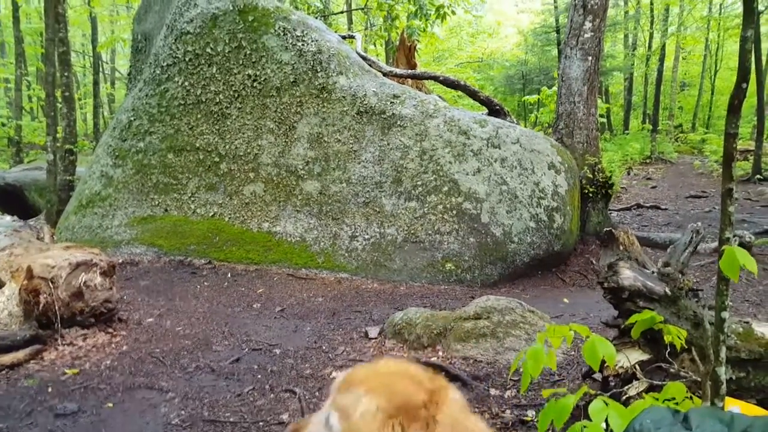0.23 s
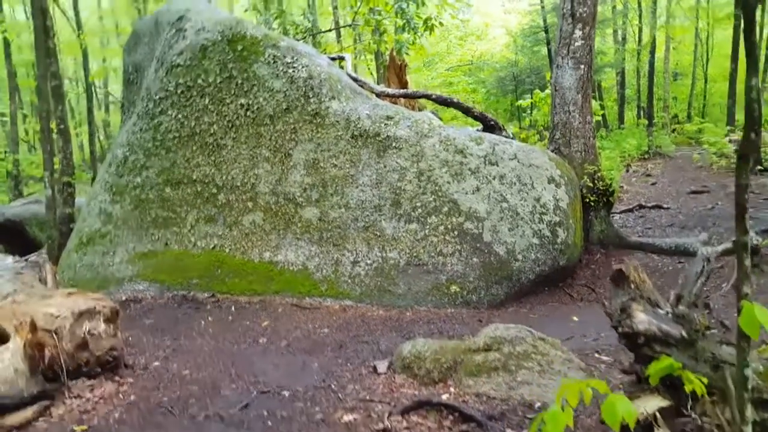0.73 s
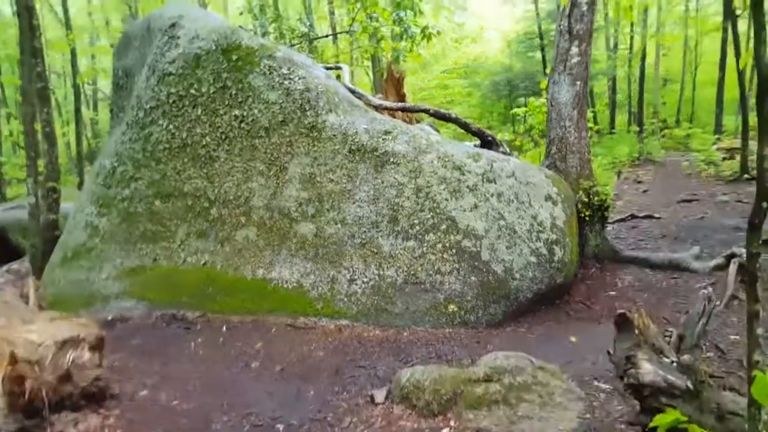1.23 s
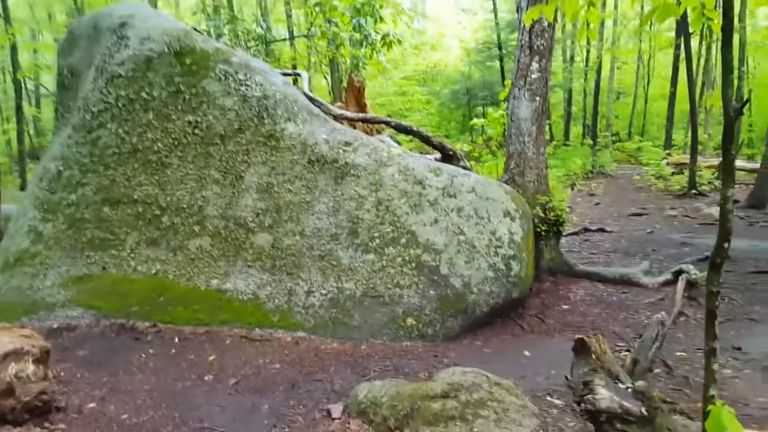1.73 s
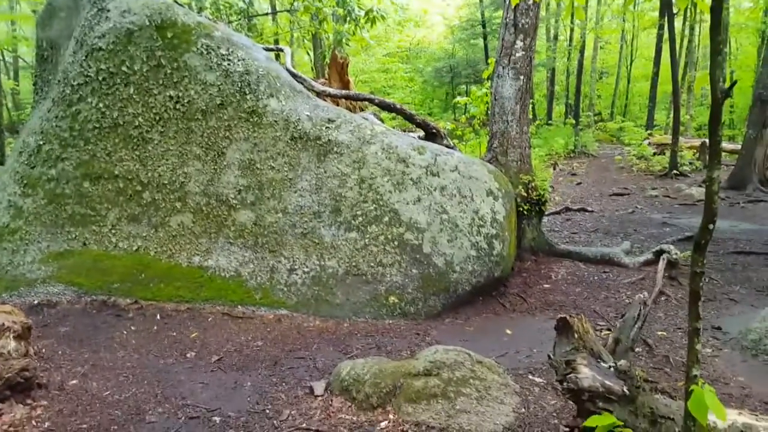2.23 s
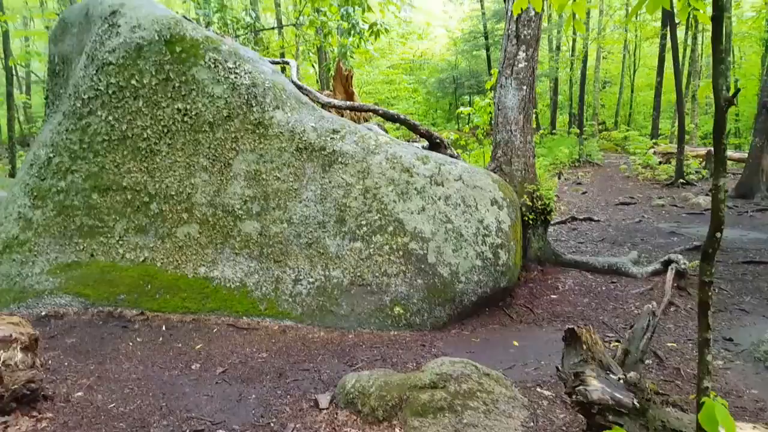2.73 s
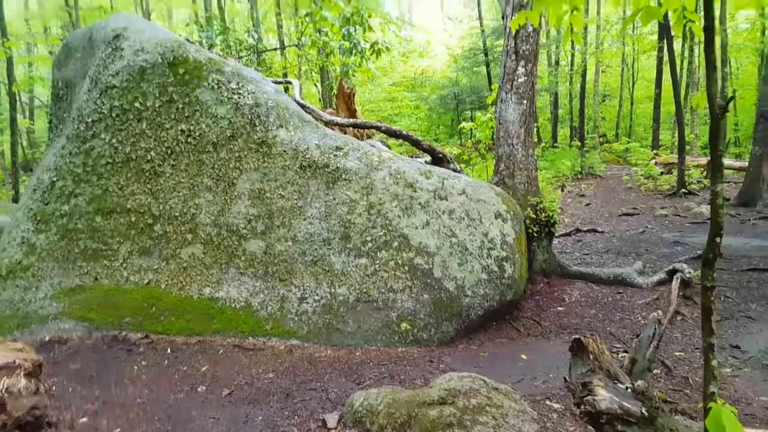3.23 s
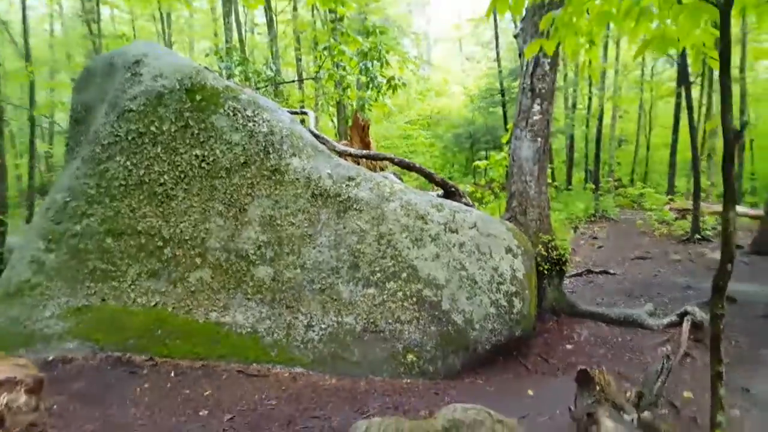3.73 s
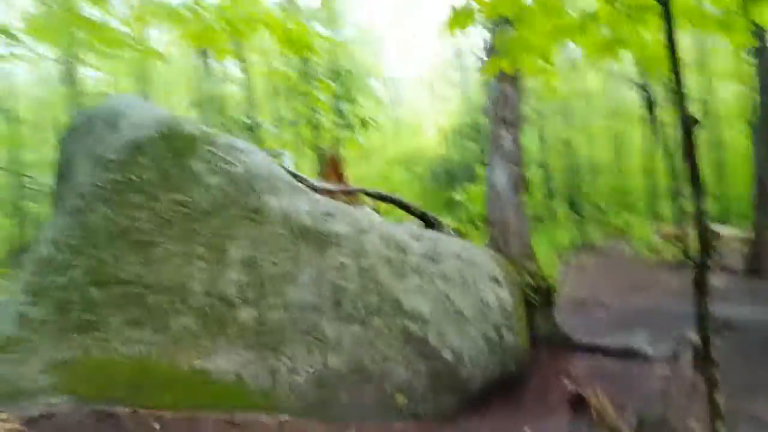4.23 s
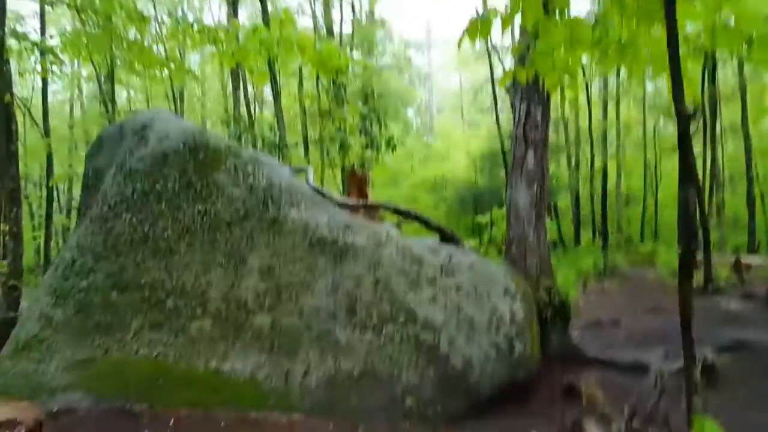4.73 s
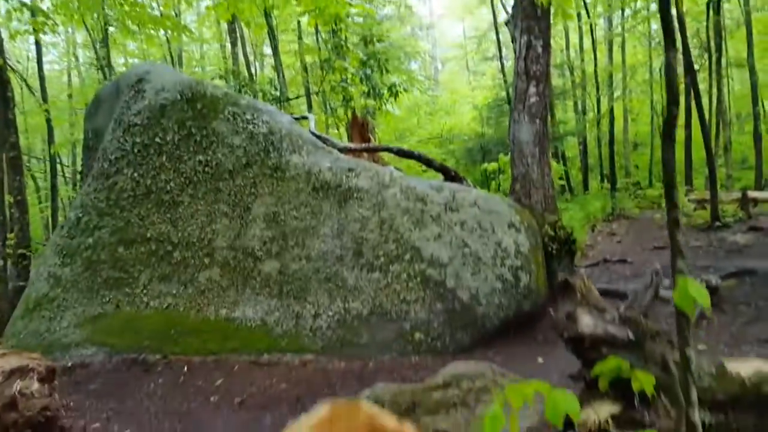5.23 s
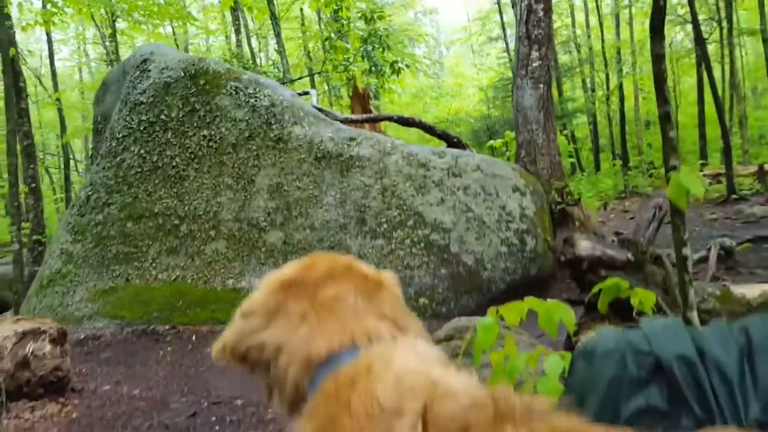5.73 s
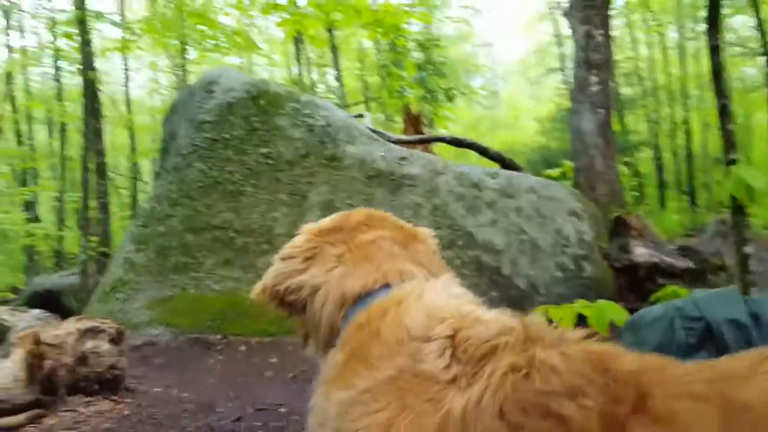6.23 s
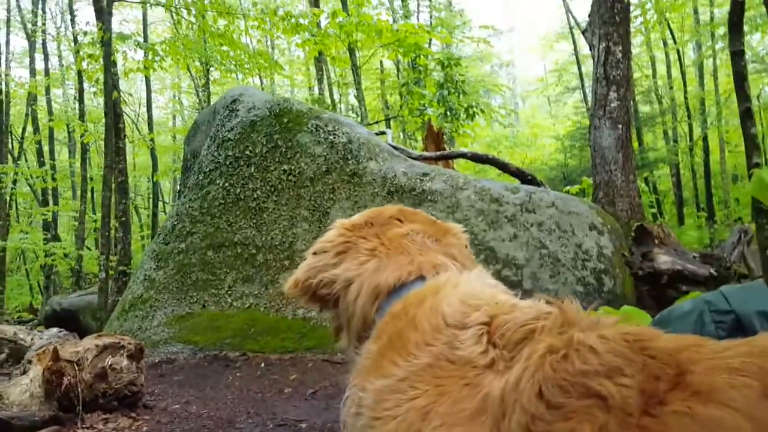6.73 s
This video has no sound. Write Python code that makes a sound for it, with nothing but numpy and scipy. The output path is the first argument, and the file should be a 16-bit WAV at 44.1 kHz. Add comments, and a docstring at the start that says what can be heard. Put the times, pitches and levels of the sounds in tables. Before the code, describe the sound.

Far water and leaves rush faintly throughout in a wet forest. Scattered drops pat down, twigs tick, and a nylon sleeve swishes softly near the microphone during the first second and a half. From about 1.1 to 2.9 seconds a nearby dog growls, a low, fluttering rumble that catches unevenly and sags at the end. Drips and ticks fill the pause. At 4.6 seconds a finger scrapes the right side of the microphone with a sharp click and dull thuds, briefly blocking that side and rubbing off by 4.9 seconds. A second, slightly louder growl swells from 4.8 seconds, with the mouth shut and more soft sleeve swishes. Around 6.2 seconds it breaks into a short, higher, falling hum, which leads straight into a third low growl lasting until about 7 seconds.

```python
"""A wet forest, a hand-held camera close to a dog. It growls three times, low and with its mouth nearly
shut: vocal pulses ring in throat and muzzle, weakening and slowing with each flap of the rumble, and a
short hum joins the last two growls. Far water and leaves rush, drops pat down from the trees, twigs tick
and a nylon jacket sleeve swishes as the camera moves. After the first growl a finger slides over the
right microphone port, seals it and lifts off."""
import sys
import numpy as np
from scipy import signal
from scipy.fft import rfft, irfft, next_fast_len
from scipy.io import wavfile
from scipy.ndimage import uniform_filter1d, map_coordinates

SR = 44100
rng = np.random.default_rng(int(sys.argv[2]) if len(sys.argv) > 2 else 0)


def pcm_store(signal):
    """Save signal as 16-bit PCM."""
    levels = np.round(np.clip(np.atleast_2d(signal), -1, 1) * 32767)
    wavfile.write(sys.argv[1], SR, levels.astype(np.int16).T)


N = 307816
T = np.arange(N) / SR

# far water and leaves: (frequency [Hz], relative density [dB])
FOREST_SPECTRUM = [(15, -42), (25, -7), (96, -4), (160, -5.5), (215, -3.5), (340, -4), (433, -5), (509, -5),
                   (804, -4.5), (1080, -6), (1410, -7), (2120, -5.5), (10100, -23), (13200, -31),
                   (15500, -28)]
# how alike the two ports hear them: (frequency [Hz], correlation [-1 to 1])
FOREST_LIKENESS = [(60, 0.25), (180, 0.92), (550, 0.46), (1650, -0.41), (4970, 0.2), (15000, -0.73)]
# twigs and leaves ticking: (time [s], level [dB], ring [Hz], relative fizz [dB])
TWIG_TICKS = [(0.057, -42, 13900, -3), (0.8733, -36.5, 2760, -16), (0.9777, -27, 3040, -18),
              (1.343, -33.5, 1490, -11), (1.3886, -31.5, 810, -17), (1.4636, -37, 1340, -16),
              (1.878, -31, 1410, -23), (1.93, -32.5, 2830, -30), (2.4345, -33, 1080, 3.5),
              (3.04, -51, 12400, -6), (3.235, -43, 3560, 10), (3.6796, -45.5, 11700, 0),
              (3.86, -48, 13000, -6), (5.382, -34.5, 1240, -21), (6.022, -30.5, 2120, -15),
              (6.8298, -32, 970, -21)]
# a twig's modes: (frequency [multiple of the ring], gain [share])
WOOD_MODES = [(1, 0.82), (.69, 0.75)]
# near drops on soil and cloth: (time [s], level [dB], ring [Hz], relative spatter [dB])
NEAR_DROPS = [(0.053, -35.5, 660, -18), (0.095, -37, 403, -15), (0.307, -27.5, 650, -11),
              (0.729, -34.5, 533, -15), (0.891, -34, 420, -7), (0.961, -23.5, 1250, -26),
              (2.938, -34, 600, -1), (3.167, -32, 546, -8), (3.098, -38.5, 403, -14),
              (3.809, -33.5, 1060, -24), (3.924, -35, 480, -7), (3.945, -37, 450, -14),
              (3.98, -36.5, 420, -5), (4.058, -39, 700, -9), (4.104, -30.5, 546, -12),
              (4.529, -38, 470, -15)]

# the sleeve's body, then its hiss when sliding fast: (frequency [Hz], relative density [dB])
CLOTH_SPECTRUM = [(100, -1), (300, 2.5), (700, 4), (1500, 1), (2000, 0), (2800, 4.5), (3500, -1),
                  (5500, -8), (7500, -6), (10000, -12), (13000, -8.5), (16000, -20)]
HISS_SPECTRUM = [(1500, -35), (3500, -3), (5000, -1.5), (7300, -2.5), (10000, -8.5), (13000, -11),
                 (16000, -10.5)]
# moves of the arm: (peak time [s], relative level [dB], rise [s], fall [s])
SLEEVE_SWISHES = [(0.42, -48, 0.17, 0.61), (0.63, -50.5, 0.3, 0.8), (.96, -52, 0.27, 0.19),
                  (1.28, -54, 1, 0.95), (4.46, -52.5, 0.23, 0.067), (5.27, -50, 0.32, 0.47),
                  (5.78, -51, 0.4, 0.25)]
# the weave scrapes: (peak time [s], relative level [dB], rise [s], fall [s], centre [Hz],
# glide [octaves/s])
WEAVE_SCRAPES = [(.55, -53, 0.46, 0.47, 2420, 0), (1.25, -54.5, 0.42, 0.4, 3550, 0)]

# the microphone port's own colour: (frequency [Hz], gain [dB])
PORT_COLOUR = [(5500, 10.5), (8000, 1.5), (9800, -9), (13000, -5.5), (16000, -6)]
# what still enters the right port under the finger: (time [s], gain [dB])
PORT_SEAL = [(4.6, 0), (4.7, -28), (4.76, -28), (4.89, 0)]
# the fingertip scrapes the port, whose cavity rings: (peak time [s], relative level [dB], rise [s],
# fall [s], resonance [Hz], glide [octaves/s], width [octaves])
FINGER_SCRAPES = [(4.603, -21, 0.042, 0.038, 3830, -35, 0.95), (4.621, -17, 0.034, 0.038, 2840, 38, 0.43),
                  (4.815, -34, 0.027, 0.056, 1330, 2, 0.46), (4.86, -30.5, 0.028, 0.029, 1950, 12, 0.41),
                  (4.92, -45, 0.026, 0.051, 3120, -23, 1), (4.945, -51.5, 0.072, 0.069, 8400, -3, 0.092)]
# it presses on the port: (peak time [s], level [dB], rise [s], fall [s], corner [Hz], glide [octaves/s])
FINGER_THUDS = [(4.609, -28.5, 0.057, 0.024, 1300, -38), (4.657, -21, 0.024, 0.07, 820, -32),
                (4.761, -23.5, 0.0094, 0.071, 388, -1), (4.843, -24.5, 0.067, 0.057, 830, -1)]

# the voice breaks into a higher register: (time [s], pitch [Hz], level [dB])
HUM_COURSE = [(6.16, 174.7, -27), (6.185, 154, -29), (6.215, 156.3, -27), (6.25, 151, -28.5),
              (6.275, 145, -29.5), (6.29, 144, -30)]
# the hum's harmonics: (frequency [multiple of the pitch], relative level [dB])
HUM_HARMONICS = [(1, 11), (2, -8), (3, -8), (4, -34)]
# throat and muzzle, lips slightly parted, then shut: (frequency [Hz], gain [dB])
MUZZLE_PARTED = [(45, -24), (70, 1.5), (100, 0.5), (175, 4), (205, 2.5), (235, -3.5), (280, 0.5),
                 (330, 7.5), (410, 1.5), (470, -8.5), (525, -23.5), (580, -10.5), (635, -3.5), (690, -13),
                 (760, -20), (880, -36), (1000, -29.5), (1085, -18), (1230, -40), (1340, -29), (1600, -56),
                 (3000, -68)]
MUZZLE_SHUT = [(40, -12), (65, -4), (90, -0.5), (140, 4.5), (190, 1.5), (215, -7), (245, -22), (290, -8.5),
               (330, -8.5), (500, -11), (600, -12.5), (660, -18), (730, -27), (850, -29), (1000, -30.5),
               (1300, -29), (3000, -69)]
# what each band loses when the voice dulls: (frequency [Hz], loss [share])
DULLING_SHARES = [(100, 0), (190, 0.11), (330, 0.36), (420, 0.49), (640, 0.83)]
# the growls: (start [s], end [s], full pitch [Hz], pitch rise [s], sag [Hz], lateness of the sag [power],
# relative level [dB], swell [s], mouth opening [s], dulling before it opens [dB, times the band's share],
# roughness [factor], flapping settles [s])
DOG_GROWLS = [(1.064, 2.85, 105, .2, 25.8, 5.95, -35, 0.08, 0.69, 26.5, 0.97, 1.6),
              (4.8, 6.175, 100.3, 0.28, 1.8, 3.44, -31, 0.3, 0.55, 2, 1.1, 1.14),
              (6.29, 7.02, 93, 0.0046, 9.5, 0.83, -33.5, 0.0054, .011, 2, 0.38, 0.79)]
# the voice catches and surges back: (time [s], depth [0-1])
VOICE_CATCHES = [(1.358, .9), (1.445, .7), (1.488, .7), (1.62, 1), (1.732, .5), (1.86, .2), (1.948, .7),
                 (2.122, .3), (2.255, .4), (4.915, .6), (4.98, 1), (5.065, .8), (5.148, .5), (5.318, .8),
                 (5.403, .8), (5.447, .7), (5.49, .8), (5.532, .8), (5.665, .9), (5.792, .6), (5.932, .9),
                 (6.025, .6), (6.06, .4), (6.11, .4), (6.355, .2)]


def amp(db):
    """Decibels to gain."""
    return 10 ** (np.asarray(db) / 20)


def unit(x):
    """Scaled to rms 1."""
    return x / np.sqrt(np.mean(x ** 2) + 1e-20)


def along(points, hz):
    """(Hz, value) points read on a log axis."""
    f, v = np.transpose(points)
    return np.interp(np.log(hz + 1), np.log(f + 1), v)


def curves(rows):
    """Each column after the time, read at every sample."""
    times, *columns = np.transpose(rows)
    return [np.interp(T, times, column) for column in columns]


def wobble(rate):
    """A smooth random curve, rate knots a second."""
    return map_coordinates(rng.standard_normal(int(N * rate / SR) + 4), [T * rate])


def swell(peak_s, rise_s, fall_s):
    """Gain of one stroke: a rounded hump, 20 dB down at rise_s before its peak and fall_s after it."""
    distance = (T - peak_s) / np.where(T < peak_s, rise_s, fall_s)
    return amp(-20 * np.minimum(distance ** 2, 10))


def filtered(x, response):
    """x times a response of frequency."""
    size = next_fast_len(N + SR // 2)
    return irfft(rfft(x, size) * response(np.fft.rfftfreq(size, 1 / SR)), size)[..., :N]


def causal(spectrum, size=8192):
    """Log gain and phase of the causal filter that has this spectrum."""
    cepstrum = irfft(np.log(amp(along(spectrum, np.fft.rfftfreq(size, 1 / SR)))))
    cepstrum[1:size // 2] *= 2
    cepstrum[size // 2 + 1:] = 0
    return rfft(cepstrum)


def rush(spectrum, likeness, patchy_db):
    """Stereo noise of rms 1 with patches of random gain; likeness lists (Hz, left-right correlation)."""
    bins = signal.stft(rng.standard_normal((2, N)), nperseg=512)[2]
    patches = uniform_filter1d(rng.standard_normal(bins.shape[1:]), size=6, axis=0)
    patches = uniform_filter1d(patches, size=12, axis=1)
    pair = signal.istft(bins * amp(patchy_db * unit(patches)), nperseg=512)[1][:, :N]
    angle = lambda hz: np.arccos(np.clip(along(likeness, hz), -1, 1)) / 2
    colour = lambda hz: amp(along(spectrum, hz)) * [np.cos(angle(hz)), np.sin(angle(hz))]
    mid, side = filtered(pair, colour)
    return unit(np.array([mid + side, mid - side]))


def swept(stroke, shape):
    """One stroke of noise whose spectral shape glides while it swells and fades."""
    s, db, rise_s, fall_s, centre_hz, glide, *width = stroke
    hz, t, bins = signal.stft(rng.standard_normal(N), SR, nperseg=256)
    gliding_hz = centre_hz * 2 ** (glide * np.clip(t - s, -rise_s, fall_s))
    gain = shape(hz[:, None] + 1, gliding_hz, *width)
    noise = signal.istft(bins * gain / np.sqrt(np.mean(gain ** 2, axis=0)), nperseg=256)[1][:N]
    return noise * amp(db) * swell(s, rise_s, fall_s)


def plop(hz, cycles, grit, size=2048):
    """A short damped ring with a gritty edge, peak 1."""
    t = np.arange(size) / SR
    band = signal.butter(2, np.clip([hz / 2, hz * 2], 50, 18000), "bandpass", fs=SR)
    grain = unit(signal.lfilter(*band, rng.standard_normal(size)))
    decay = np.exp(-t * hz / cycles)
    rustle = decay + .11 * np.exp(-t / .008)
    attack = 1 - np.exp(-t / .00015)
    hit = (np.sin(2 * np.pi * hz * t) * decay + grit * grain * rustle) * attack
    return hit / np.abs(hit).max()


def forest(level_db=-49):
    """Far off, water and leaves rush steadily."""
    return amp(level_db + .6 * wobble(3)) * rush(FOREST_SPECTRUM, FOREST_LIKENESS, patchy_db=1.5)


def tree_echo(x, t60=.045):
    """Trunks and a boulder scatter a short echo back to the microphone."""
    t = np.arange(SR // 2) / SR
    tail = rng.standard_normal((2, len(t))) * amp(-60 * t / t60) * (t > .008)
    return signal.fftconvolve(x, tail / np.linalg.norm(tail[0]), axes=1)[:, :N]


def twigs(ring_s=.0018):
    """Small twigs and leaves tick with a woody ring and a brief fizz."""
    out = np.zeros((2, N + SR))
    for s, db, hz, fizz_db in TWIG_TICKS:
        wood = sum(share * plop(hz * ratio, cycles=hz * ratio * ring_s, grit=.25)
                   for ratio, share in WOOD_MODES)
        fizz = np.array([plop(6500, cycles=1.9, grit=.52) for port in range(2)])
        out[:, round(s * SR):][:, :len(wood)] += amp(db) * (wood + amp(fizz_db) * fizz)
    return out[:, :N]


def drips(far_count=70, far_db=-43.5):
    """Drops land nearby with a dull pat and a spatter; fainter ones fall farther off."""
    out = np.zeros((2, N + SR))
    far = [(s, far_db + 1.5 * rng.standard_normal(), 800 * np.exp(.56 * rng.standard_normal()), -5)
           for s in rng.random(far_count) * N / SR]
    for s, db, hz, spatter_db in list(NEAR_DROPS) + far:
        pat = plop(hz, cycles=1.1, grit=.5) + amp(-11) * plop(330, cycles=1.1, grit=.6)
        spatter = np.array([plop(2120, cycles=9.4, grit=1.9) for port in range(2)])
        out[:, round(s * SR):][:, :len(pat)] += amp(db) * (pat + amp(spatter_db) * spatter)
    return out[:, :N]


def sleeve(rest_db=-58, hiss_db=-2):
    """Beside the camera, nylon slides on nylon in tiny slips; a fast move of the arm adds a bright hiss."""
    swish_power = sum((amp(db) * swell(s, rise, fall)) ** 2 for s, db, rise, fall in SLEEVE_SWISHES)
    rub = np.sqrt(amp(rest_db) ** 2 + swish_power)
    slips = amp(.54 * wobble(25) + 1.75 * wobble(300))
    body = rush(CLOTH_SPECTRUM, [(300, .44), (1500, .092), (3000, .25)], patchy_db=1.5)
    speed = rub / rub.max()
    hiss = amp(hiss_db) * speed * rush(HISS_SPECTRUM, [(3000, .041)], patchy_db=2.5)
    weave = lambda hz, centre: np.exp(-(np.log2(hz / centre) / .35) ** 2)
    scrape = np.array([sum(swept(row, weave) for row in WEAVE_SCRAPES) for port in range(2)])
    return slips * (rub * (body + hiss) + scrape) * amp([[.8], [-.8]])  # slightly left


def finger(knock_s=4.611, knock_db=-8):
    """Right on the microphone, skin hisses across the port, thuds as it seals it and rubs as it lifts."""
    def cavity(hz, centre, width):
        resonance = np.exp(-np.log2(hz / centre) ** 2 / (2 * width) ** 2)
        sizzle = .56 * np.exp(-((hz - 13000) / 2500) ** 2)
        return (resonance + .017 + sizzle) * amp(along(PORT_COLOUR, hz))

    rumble = lambda hz, corner: 1 / np.sqrt(1 + (hz / corner) ** 3.75)
    scrapes = sum(swept(row, cavity) for row in FINGER_SCRAPES) * amp(1.5 * wobble(400))
    touch = scrapes + sum(swept(row, rumble) for row in FINGER_THUDS)
    knock = amp(knock_db) * plop(2100, cycles=2.6, grit=1.0)  # the fingertip catches the rim
    touch[round(knock_s * SR):][:len(knock)] += knock
    low_cut = lambda hz: hz ** 4 / (hz ** 4 + 48 ** 4)
    return filtered(touch, low_cut) * amp([[-44], [0]])  # the left port barely hears it


def hum(fade_s=.02):
    """The vocal folds tighten for a moment into a nearly pure, falling tone with a little rasp."""
    pitch, level_db = curves(HUM_COURSE)
    phase = 2 * np.pi * np.cumsum(pitch * (1 + .03 * wobble(120))) / SR
    tone = unit(sum(amp(db) * np.sin(round(k) * phase) for k, db in HUM_HARMONICS))
    breath = rng.standard_normal(N) * (1 + np.sin(phase))
    rasp_colour = causal([(150, -26), (300, -1), (600, -4), (850, -17), (3000, -37)])  # (Hz, dB)
    rasp = unit(signal.fftconvolve(breath, irfft(np.exp(rasp_colour)))[:N])
    inside_s = np.minimum(T - HUM_COURSE[0][0], HUM_COURSE[-1][0] - T)
    gate = np.clip(inside_s / fade_s + 1, 0, 1)
    return amp(level_db) * (tone + amp(-15) * rasp) * gate


def effort(row, slack_hz=76.63, onset_db=18, attack_s=.011, release_s=.058):
    """One growl's course: pitch and level creep up, hold and sag; the mouth opens; the flapping settles."""
    start, end, full_hz, rise_s, sag_hz, lateness, db, swell_s, open_s, opening_db, rough, settle_s = row
    age = np.clip(T - start, 0, end - start)
    slack = np.exp(-(age / rise_s) ** 2)
    held_hz = full_hz - sag_hz * (age / (end - start)) ** lateness
    pitch = held_hz + (slack_hz - held_hz) * slack
    sag_octaves = np.log2(full_hz / held_hz)
    level_db = db - onset_db * np.exp(-age / swell_s) - 16.5 * sag_octaves
    dull_db = opening_db * np.clip(1 - age / open_s, 0, 1) + 27.5 * sag_octaves
    roughness = rough * (1 - slack) * np.exp(-(age / settle_s) ** 4)
    gate = np.clip(np.minimum(age / attack_s, (end - T) / release_s), 0, 1)
    return pitch, level_db, dull_db, roughness, gate


def flapping(t, pitch, pulses_per_flap=4.45, half_catch_s=.014):
    """Flaps counted along a growl, a whole number between two catches; and how hard the voice catches."""
    catches = [(s, depth) for s, depth in VOICE_CATCHES if t[0] < s < t[-1]]
    free_flaps = np.cumsum(pitch) / SR / pulses_per_flap
    at_catches = np.interp([s for s, depth in catches], t, free_flaps)
    whole = np.cumsum(np.round(np.diff(at_catches, prepend=0)))
    flaps = free_flaps + np.interp(free_flaps, at_catches, whole - at_catches)
    catch = sum(depth * np.maximum(0, 1 - np.abs(t - s) / half_catch_s) for s, depth in catches)
    return flaps, catch


def growl(row, muzzle, rasp_db, size=4096):
    """Vocal pulses, each with a puff of air, ring in the throat; each flap weakens, dulls and slows them."""
    catch_drag, jitter, shimmer_db = .23, .027, 1.0
    puff_s, puff_edge_hz = .004, 750
    throat_rings = .6  # 0 = symmetric pulses, 1 = strike and ring
    live = (T > row[0]) & (T < row[1])
    pitch, level_db, dull_db, roughness, gate = (curve[live] for curve in effort(row))
    flaps, catch = flapping(T[live], pitch)
    dip = roughness * amp(3 * wobble(20)[live]) * np.cos(np.pi * flaps) ** 4 + 1.5 * catch
    swing = .04 * (1 + roughness) * np.cos(2 * np.pi * (flaps - .08))  # pitch lags the level
    rate = pitch * (1 - swing - catch_drag * catch + jitter * wobble(90)[live])
    pulses = np.flatnonzero(np.diff(np.floor(np.cumsum(rate) / SR), prepend=-1))

    hz = np.fft.rfftfreq(size, 1 / SR)
    decay = np.exp(-np.arange(size) / SR / puff_s)
    puffs = rfft(rng.standard_normal((len(pulses), size)) * decay / np.linalg.norm(decay))
    puffs *= 1j * hz / (puff_edge_hz + 1j * hz)  # high-pass
    dulling = (dull_db + 4.5 * dip)[pulses, None] * causal(DULLING_SHARES, size)
    throat = causal(muzzle, size) - dulling
    lead = size // 8  # samples of room ahead of each pulse
    colour = np.exp(throat.real + 1j * (throat_rings * throat.imag - 2 * np.pi * hz * lead / SR))

    strength = (gate * amp(level_db - 2 * dip) * SR / pitch / np.sqrt(2))[pulses, None]
    shimmer = amp(shimmer_db * rng.standard_normal(strength.shape))
    rings = strength * shimmer * irfft(colour * (1 + amp(rasp_db) * puffs))
    positions = np.flatnonzero(live)[pulses, None] + np.arange(size) - lead
    return np.bincount(positions.ravel(), rings.ravel(), N)[:N]


def dog():
    """Close to the microphone: the first growl from straight ahead, the rest from a little to the left."""
    first = growl(DOG_GROWLS[0], MUZZLE_PARTED, rasp_db=-10)
    second = growl(DOG_GROWLS[1], MUZZLE_SHUT, rasp_db=-6)
    third = growl(DOG_GROWLS[2], MUZZLE_SHUT, rasp_db=-5)
    lead_s = np.array([[1], [-1]]) * .00015  # early at the left port, late at the right
    return first + filtered(second + hum() + third, lambda hz: np.exp(2j * np.pi * hz * lead_s))


def scene():
    """Everything in the air reaches both microphone ports, but the finger shades the right one."""
    near = dog() + drips() + twigs()
    air = near + amp(-23) * tree_echo(near) + forest() + sleeve()
    port_gains = amp([np.zeros(N), curves(PORT_SEAL)[0]])
    return air * port_gains + finger()


def record(dry):
    """The camera keeps nothing above its band limit."""
    return filtered(dry, lambda hz: hz < 15850)


dry = scene()
out = record(dry)
pcm_store(out)
```